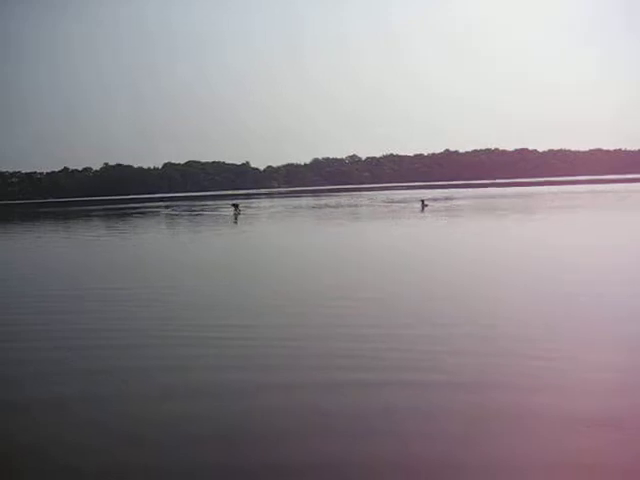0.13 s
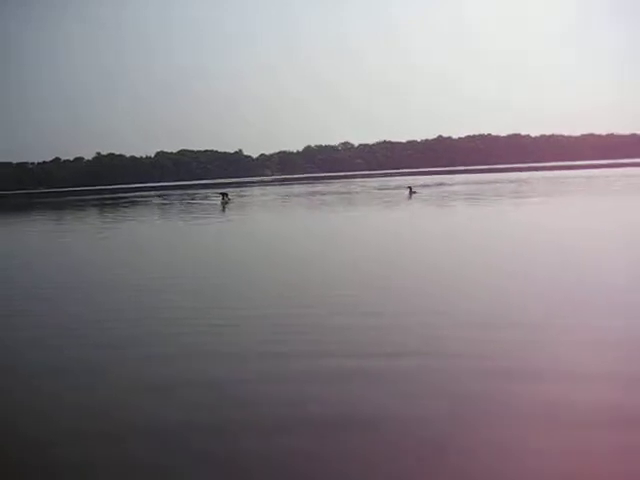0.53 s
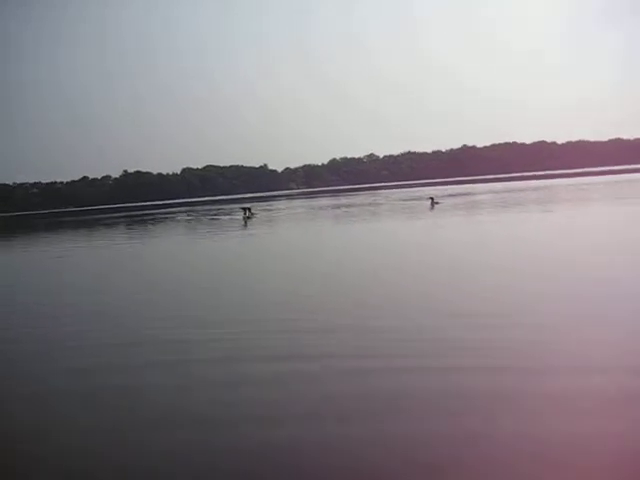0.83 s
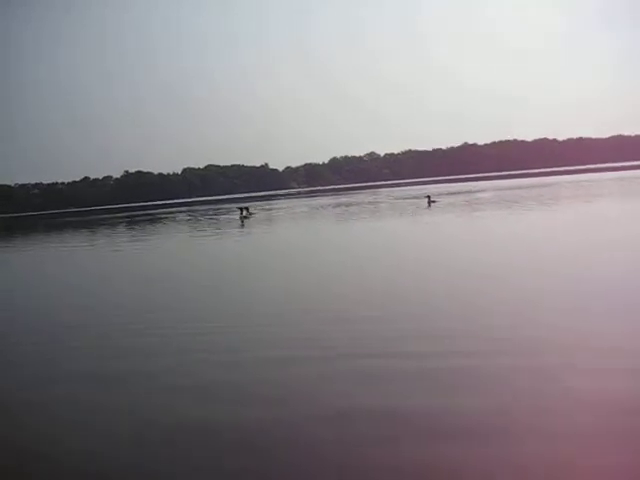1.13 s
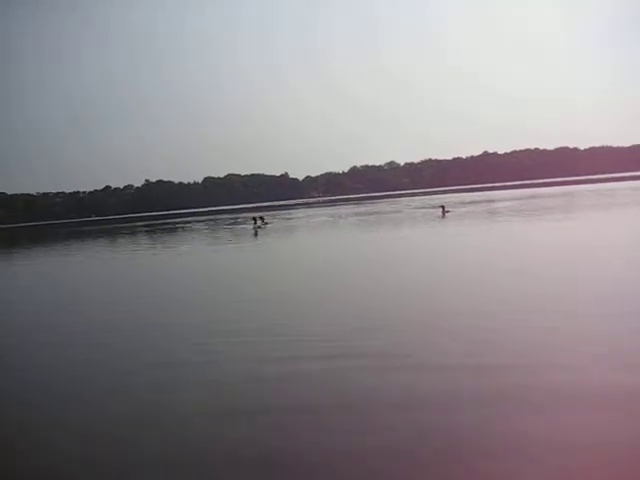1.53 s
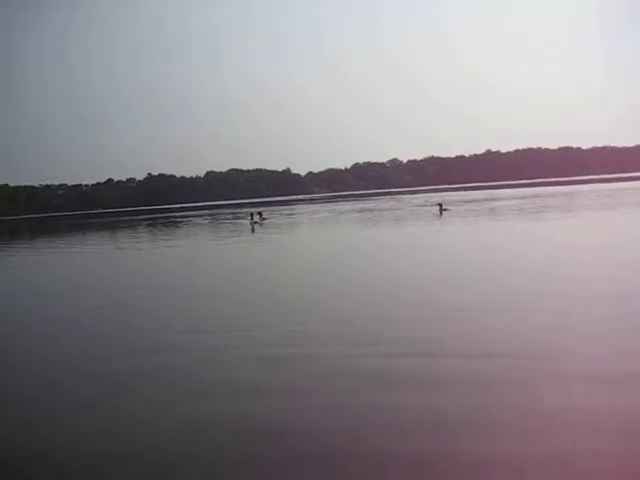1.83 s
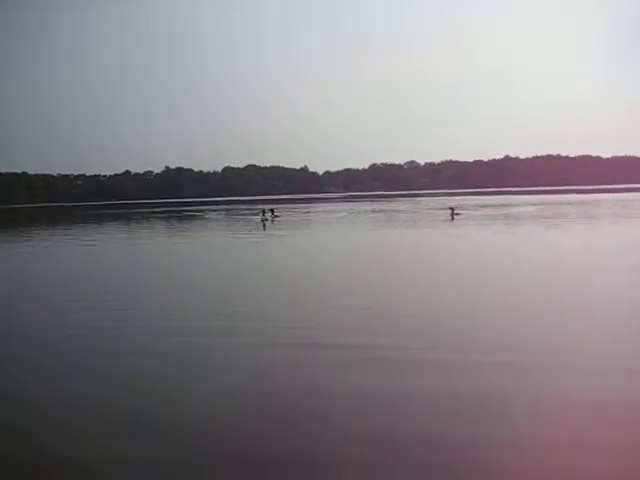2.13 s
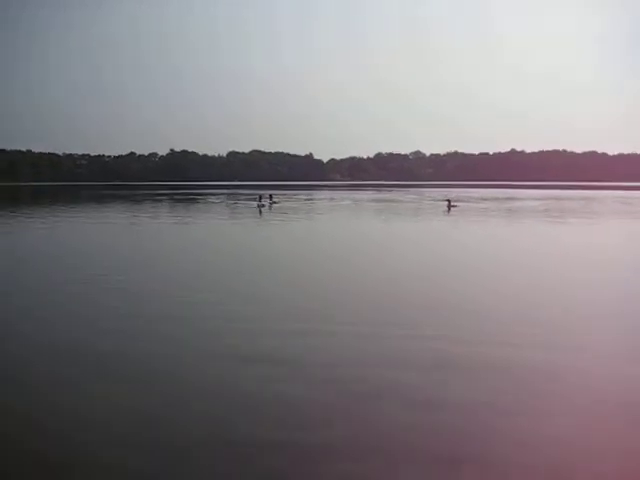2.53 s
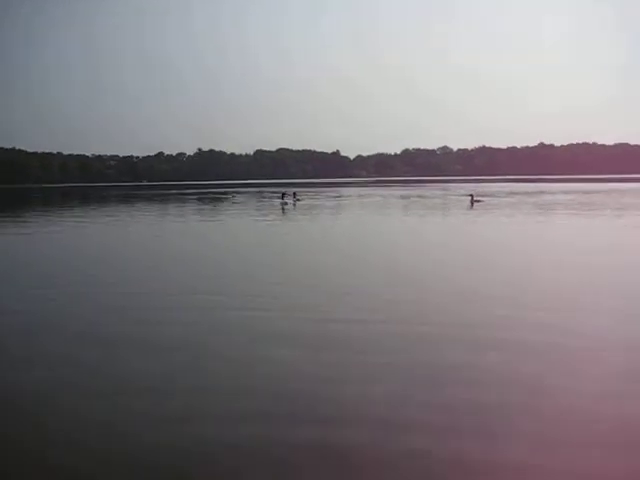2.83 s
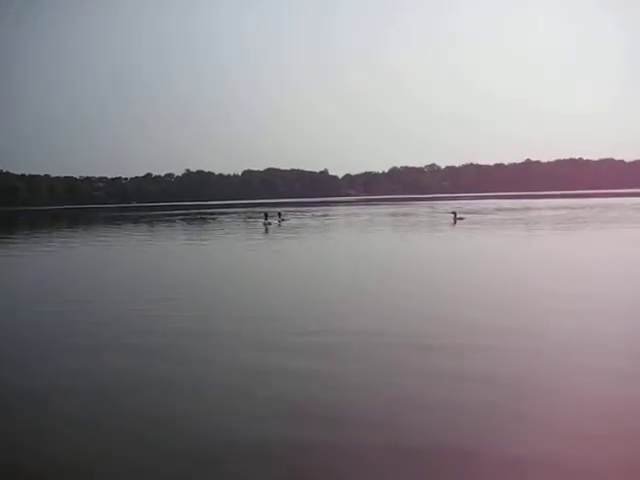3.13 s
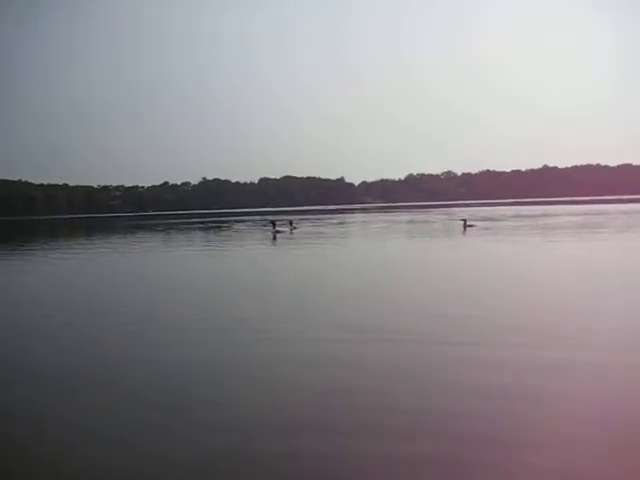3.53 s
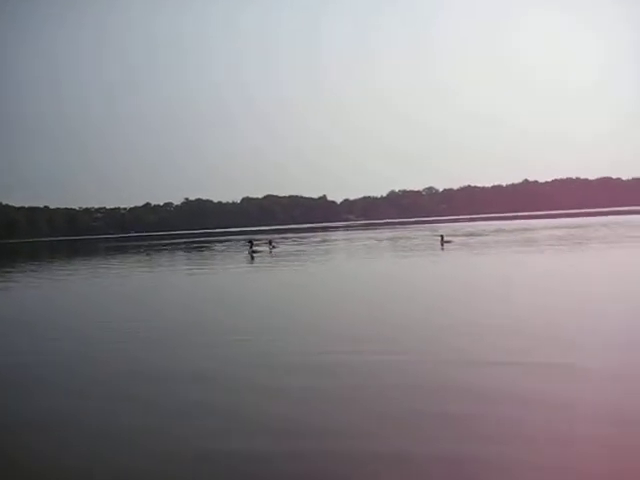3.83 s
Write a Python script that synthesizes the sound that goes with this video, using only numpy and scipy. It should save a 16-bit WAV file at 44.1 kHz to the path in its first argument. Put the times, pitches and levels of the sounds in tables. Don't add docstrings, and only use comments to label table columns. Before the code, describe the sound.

Wavering loon calls break between low and high notes while wind buffets the microphone on a lake.

```python
import sys
import numpy as np
from scipy import signal
from scipy.io import wavfile

SR = 44100
rng = np.random.default_rng(int(sys.argv[2]) if len(sys.argv) > 2 else 0)


def output_pcm(signal):
    pcm = np.clip(np.atleast_2d(signal).T, -1, 1) * 32767
    wavfile.write(sys.argv[1], SR, np.round(pcm).astype(np.int16))


def linear_from_db(decibels):
    return 10 ** (np.asarray(decibels, float) / 20)


N = 176400

# time_s, level_db
WIND_GUSTS = [(.08, -32), (0.302, -31), (0.742, -37), (1.05, -35), (1.351, -25.5), (1.802, -32),
              (2.24, -36), (2.499, -37.5), (2.72, -28), (3.029, -38), (3.599, -33.5), (4, -31.5)]
# freq_hz, density_db_per_hz
WIND_SPECTRUM = [(14, -4.5), (25, -0.5), (60, -0.5), (120, -4), (200, -10), (320, -28.5), (550, -51),
                 (900, -63)]
# time_s, peak_db, pitch_hz, flutter_db
BUFFETS = [(0.082, -16.5, 111, -15.5), (0.106, -22, 108.5, -11), (0.227, -22.5, 108, -15),
           (0.277, -25.5, 112.7, -11.5), (0.325, -28, 110.0, -10), (0.409, -20, 102.3, -20.3),
           (0.447, -15, 110.0, -14.5), (0.555, -20.5, 94.4, -17.5), (0.607, -13.5, 109.6, -18),
           (0.684, -23.5, 113, -15.5), (0.814, -26, 109.7, -11), (0.842, -19.5, 105.0, -21),
           (0.888, -21, 82.8, -22), (0.955, -19.5, 111, -15), (1.128, -20.5, 110.0, -21.5),
           (1.156, -21.5, 109.8, -13), (1.2, -20, 113.9, -17.5), (1.251, -16, 82.6, -20),
           (1.278, -22.5, 69.8, -18.5), (1.312, -22, 100.0, -19), (1.349, -15.5, 109, -12),
           (1.374, -13, 112, -21), (1.417, -18.5, 103.0, -19), (1.479, -16.5, 99.0, -26),
           (1.506, -20, 90.6, -26), (1.577, -16, 108.0, -11.5), (1.611, -24, 110.0, -13.5),
           (1.641, -23, 99.0, -19.6), (1.698, -19, 110.0, -19.5), (1.754, -30, 98, -16),
           (1.801, -20, 79.0, -25.5), (1.847, -32, 107, -14.5), (1.89, -18, 109, -12.5),
           (1.977, -14.5, 111.3, -20), (2.028, -18, 110.0, -19), (2.134, -15.5, 110.0, -13.5),
           (2.313, -12, 82.5, -24), (2.454, -22, 82.3, -32), (2.657, -22.3, 107.5, -13),
           (2.711, -27, 111, -9.5), (2.739, -22, 109.6, -11.5), (2.772, -27, 110.0, -11),
           (2.877, -16, 105, -19), (2.936, -20, 108.7, -22), (2.976, -17.5, 83.2, -35),
           (3.103, -16, 105.0, -22), (3.64, -25, 111, -17.5), (3.762, -24, 77, -23.5),
           (3.806, -21, 110.0, -17.5), (3.939, -17.5, 79.1, -28)]
# time_s, peak_db, brightness_db
TICKS = [(0.2771, -10.5, -21.5), (.4435, -20.5, -27), (.705, -27, -23), (0.9442, -20, 0.5),
         (1.131, -17, -11), (1.179, -22, -9), (1.2098, -29, -11), (1.2167, -8, -18.5), (1.573, -23.5, -13),
         (1.62, -22, -8), (2.418, -31, 6.5), (2.681, -27, -23), (2.854, -19.5, -27), (3.339, -26, 2.5),
         (3.3459, -1.5, -4), (3.61, -14, -25.5), (3.7572, -12, -25), (3.814, -26, 7)]
# freq_hz, level_db, t60_s
CASE_MODES = [(680, -4, 0.0049), (1030, -1, 0.0093), (1393, 1, 0.015), (2140, -17, 0.017)]
# freq_hz, level_db, t60_s
CRACK_MODES = [(2840, -0.5, 0.0097), (3700, -5.5, 0.007), (5234, 15.5, 0.0013)]
# time_s, pitch_hz, level_db, effort_db
HIGH_NOTES = [
    [(.062, 1077, -13.5, 0), (.112, 1284, -16.5, -0.5), (.155, 1016, -19.5, -2), (.21, 1191, -13, 0),
     (.265, 977, -25, -5), (.318, 1011, -22.5, -1.5), (.362, 953, -34, -9)],
    [(1.498, 979, -18.5, -5), (1.547, 1214, -11, 0.5), (1.592, 1024, -22, -4), (1.645, 1230, -12, 0.5),
     (1.695, 1005, -21, -2.5), (1.747, 1215, -12.5, 0.5), (1.80, 981, -23, -4), (1.856, 1127, -12, -1.5),
     (1.908, 914, -27.5, -7.5)],
    [(2.624, 1159, -9, 2), (2.674, 872, -26.5, -14.5), (2.727, 1144, -14.5, -0.5),
     (2.782, 860, -24.5, -23.5), (2.803, 895, -34.5, -9)],
]
# time_s, pitch_hz, level_db, effort_db
LAST_HIGH_NOTE = [(3.274, 1186, -12.5, 0), (3.293, 1200, -11.5, -1), (3.338, 1017, -17, -6),
                  (3.389, 1226, -12.5, 1), (3.436, 1009, -17.5, -4.5), (3.488, 1220, -12, 0),
                  (3.539, 1005, -17.5, -3), (3.592, 1183, -11.5, -1),
                  (3.646, 964.3, -21.5, -5.5),
    (3.705, 992, -19, -1),
    (3.746, 948, -36.5, -14),
]
# time_s, pitch_hz, level_db, effort_db
LOW_NOTES = [
    [(.357, 658, -40.5, -1), (.387, 635, -50, -8.5)],
    [(1.325, 479, -53.5, 6.5), (1.358, 585, -42.5, -6.5)],
    [(1.364, 684, -37, -3), (1.398, 659, -35, -3.5)],
    [(1.4, 650, -29, -5.5), (1.412, 694, -34, -1), (1.456, 879, -24.5, 3), (1.498, 794, -30.5, -13)],
    [(1.905, 687, -32.5, -9.5), (1.935, 653, -36.5, 0), (1.975, 608, -48.5, 1)],
    [(2.485, 634, -42.5, -10), (2.525, 744.6, -28.5, 2.5), (2.572, 677, -35, -20), (2.604, 794, -27, 2.5)],
    [(2.603, 797, -35, -5.5), (2.618, 920, -27, -8), (2.632, 896, -33.5, -1)],
    [(2.797, 662, -32, -11.5), (2.828, 754, -29, 2), (2.852, 784, -32, -13.5), (2.885, 634, -36, -11.5),
     (2.925, 604.5, -42.5, -4), (2.945, 575, -51.5, 2)],
    [(3.157, 457, -61.5, 17), (3.182, 568, -44, 5.5)],
    [(3.184, 752, -25, 0), (3.203, 768.7, -26, 7), (3.238, 733, -25, -10), (3.278, 1020, -22.5, -8.5)],
    [(3.738, 693, -42.5, -10.5), (3.765, 638, -35.5, 1.5)],
]
# level_db, gain_db_per_effort_db
HIGH_PARTIALS = [(-1, 0), (-21, 0.42), (-20.5, 6), (-30.5, 3), (-34.5, -1), (-44.5, 2.5)]
# level_db, gain_db_per_effort_db
LOW_PARTIALS = [(0.5, 0), (-0.5, 1), (-12, 1.3), (-19.5, 2), (-27, 1.5), (-30, 1.1)]
# freq_hz, gain_db
THROAT = [(800, 0), (1140, 1), (1600, 1.5), (2500, -1), (3000, -7), (3300, 4.5), (3480, -3), (3700, -1)]
SECOND_BIRD_DB = [-0.3, -2, -10, 1.5, -2.5, -11]


def rms_one(x):
    return x / np.sqrt(np.mean(x ** 2) + 1e-20)


def at_hz(points, hz):
    points_hz, points_db = np.transpose(points)
    return np.interp(np.log(hz), np.log(points_hz), points_db)


def bandpass(x, order, low_hz, high_hz):
    return signal.sosfilt(signal.butter(order, [low_hz, high_hz], "band", fs=SR, output="sos"), x)


def lowpass(x, hz):
    return signal.sosfilt(signal.butter(2, hz, fs=SR, output="sos"), x)


def drift(rate_hz):
    r = np.exp(-2 * np.pi * rate_hz / SR)
    noise = rng.standard_normal(N + SR)
    return rms_one(signal.lfilter([1], [1, -2 * r, r * r], noise)[SR:])


def faint_noise():
    return linear_from_db(-51) * rng.standard_normal(N)


def wind():
    lump_db, lumps_per_s, trim_db = 4.5, 18, -1
    lump = np.minimum(drift(lumps_per_s), 1.5)
    edges_hz = 14 * 2 ** np.arange(0, 6.1, .5)
    white = rng.standard_normal((2, N))
    out = 0
    for k, (low_hz, high_hz) in enumerate(zip(edges_hz, edges_hz[1:])):
        band = bandpass(white[k % 2], 2, low_hz, high_hz)
        depth_db = lump_db * min(0.23 + 0.24 * k, 1.2)
        out = out + band * linear_from_db(at_hz(WIND_SPECTRUM, np.sqrt(low_hz * high_hz)) + depth_db * lump)
    time_s, level_db = np.transpose(WIND_GUSTS)
    gust_db = np.interp(np.arange(N) / SR, time_s, level_db)
    return rms_one(lowpass(out, 420)) * linear_from_db(gust_db + trim_db)


def buffets():
    width_cycles, push, flutter_s = 0.58, 0.63, 0.014
    t = np.arange(N) / SR
    flutter = rms_one(bandpass(rng.standard_normal(N), 3, 140, 340))
    turns = rng.uniform(0, 2 * np.pi, len(BUFFETS))
    out = 0
    for (time_s, peak_db, hz, flutter_db), turn in zip(BUFFETS, turns):
        late = t - time_s
        bump = np.exp(-(late * hz / width_cycles) ** 2 * 2)
        swing = np.cos(2 * np.pi * late * hz + turn) + push * np.cos(turn)
        out = out + linear_from_db(peak_db) * bump * swing
        out = out + linear_from_db(peak_db + flutter_db) * np.exp(-(late / flutter_s) ** 2) * flutter
    return out


def ring(clicks, hz, t60_s):
    r, w = linear_from_db(-60 / (t60_s * SR)), 2 * np.pi * hz / SR
    return signal.lfilter([0, np.sin(w)], [1, -2 * r * np.cos(w), r * r], clicks + 1e-18)


def ticks():
    bounces = ((0, -4), (.0013, -5), (.0042, -16.5))  # lag_s, loss_db
    trim_db, spread_db = -14.0, 0.25
    time_s, peak_db, bright_db = np.transpose(TICKS)
    out = 0
    for modes, extra_db in ((CASE_MODES, 0 * peak_db), (CRACK_MODES, bright_db)):
        for hz, mode_db, t60_s in modes:
            clicks = np.zeros(N)
            for lag_s, loss_db in bounces:
                chance_db = rng.normal(0, spread_db, len(TICKS))
                sign = rng.choice([-1, 1], len(TICKS)) if lag_s else -1
                level_db = peak_db + extra_db + mode_db + loss_db + trim_db + chance_db
                clicks[((time_s + lag_s) * SR).astype(int)] = linear_from_db(level_db) * sign
            out = out + ring(clicks, hz, t60_s)
    return out


def shore(x):
    echo_start_s, echo_spread_s, echo_db = 0.63, .2, -51
    near_db, near_t60_s = -39, 0.68
    t = np.arange(2 * SR) / SR
    late = np.clip((t - echo_start_s) / echo_spread_s, 0, None)
    swell = linear_from_db(echo_db) * late * np.exp(-late) / np.sqrt(echo_spread_s)
    near = linear_from_db(near_db - 60 * t / near_t60_s) / np.sqrt(near_t60_s)
    dull = signal.lfilter([.3], [1, -.7], rng.standard_normal(2 * SR))
    tail = dull * (swell + near) * 10 / np.sqrt(SR)
    return signal.fftconvolve(x, tail)[:N]


def ease(values, place, dwell):
    last = len(values) - 2
    k = np.minimum(place.astype(int), last)
    a, b, x = values[k], values[k + 1], place - k
    start = np.sin(np.pi / 2 * x)
    middle = .5 - .5 * np.cos(np.pi * x)
    end = 1 - np.cos(np.pi / 2 * x)
    u = np.where(k == last, end, np.where(k == 0, start, middle))
    power = np.where((k == last) | (k == 0), 1, dwell)
    low_share = np.where(b > a, 1 - u, u).clip(0) ** power
    return np.maximum(a, b) - np.abs(b - a) * low_share


def note(rows, partials, wobble):
    edge_s, break_s, jitter, break_jitter = .003, 0.0057, .001, 0.085
    rise_db_per_oct_s, rise_effort, shimmer_db, uneven_db = 0.16, 0.28, 0.92, 1.3
    low_top_hz, rasp_db = 940, -30
    shimmer, pitch_drift, crack, uneven, rasp = wobble

    s, hz, db, effort = np.transpose(rows)
    second_bird = 2.4 < s[0] < 3.0
    i = np.arange(int(s[0] * SR), int((s[-1] + edge_s) * SR))
    place = np.interp(i / SR, s, np.arange(len(s)))
    hz, db, effort = ease(hz, place, 1.2), ease(db, place, 1.7), ease(effort, place, 1.4)
    low = hz < low_top_hz
    rise = np.gradient(np.log2(hz)) * SR
    db = db + rise_db_per_oct_s * rise + shimmer_db * shimmer[i]
    effort = effort + rise_effort * rise * low

    since, left = i - i[0], i[-1] - i
    cracked = break_jitter * (np.exp(-since / (break_s * SR)) + np.exp(-left / (break_s * SR)))
    unsteady = 1 + jitter * pitch_drift[i] + cracked * crack[i]
    phase = 2 * np.pi * np.cumsum(hz * unsteady) / SR
    edge = np.sin(np.pi / 2 * np.clip(np.minimum(since, left) / (2 * edge_s * SR), 0, 1)) ** 2

    tone = 0
    for k, (base_db, gain) in enumerate(partials, 1):
        partial_db = db + base_db + gain * effort + at_hz(THROAT, k * hz)
        partial_db = partial_db + second_bird * SECOND_BIRD_DB[k - 1]
        partial_db = partial_db + uneven_db * min(k - 1, 3) * uneven[i - 3000 * k]
        tone = tone + linear_from_db(partial_db) * np.sin(k * phase + k * k)
    out = np.zeros(N)
    out[i] = edge * (tone + linear_from_db(db + rasp_db + effort) * low * rasp[i])
    return out


def loons():
    rasp = rms_one(bandpass(rng.standard_normal(N), 2, 3700, 5600))
    wobble = drift(60.0), drift(80.0), drift(500.0), drift(18.0), rasp
    high = sum(note(rows, HIGH_PARTIALS, wobble) for rows in HIGH_NOTES + [LAST_HIGH_NOTE])
    low = sum(note(rows, LOW_PARTIALS, wobble) for rows in LOW_NOTES)
    return high + low


def scene():
    birds = loons()
    return (faint_noise() + wind() + buffets() + ticks() + shore(birds) + birds)[None]


def band_limit(x):
    return signal.sosfilt(signal.butter(12, 17090, fs=SR, output="sos"), x)


def record(dry):
    start_s, step, offset, slow = .07256, 1 / 200, 0.0025, 4
    soft = lowpass(dry, 6830)
    held = np.zeros_like(dry)
    held[:, ::slow] = slow * (step * np.round(soft[:, ::slow] / step) + offset)
    upsampler = signal.cheby2(8, 50, 5972 + 1100, fs=SR, output="sos")
    smooth = signal.sosfiltfilt(upsampler, held, padtype="even")
    mix = smooth * (np.arange(N) >= start_s * SR)
    return band_limit(mix)


dry = scene()
out = record(dry)
output_pcm(out)
```